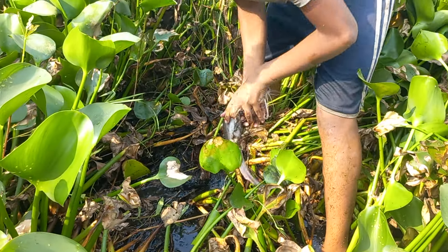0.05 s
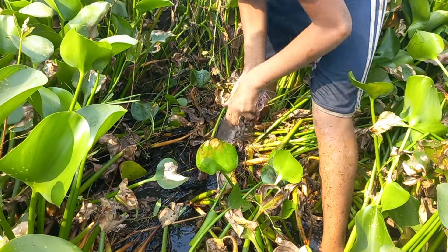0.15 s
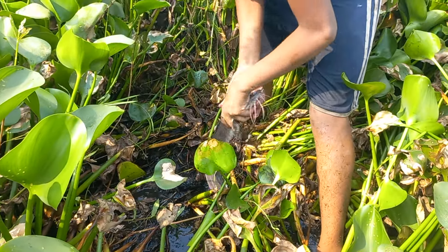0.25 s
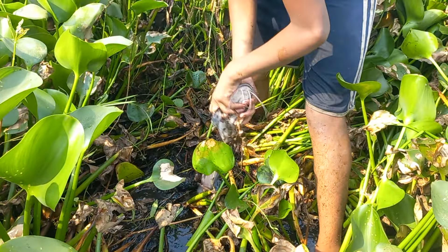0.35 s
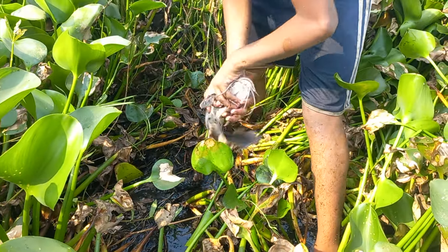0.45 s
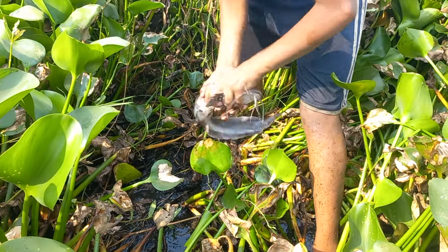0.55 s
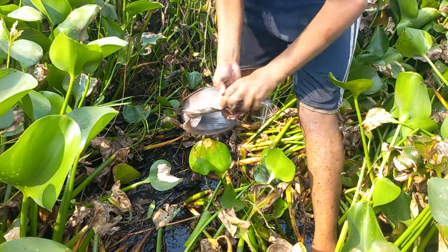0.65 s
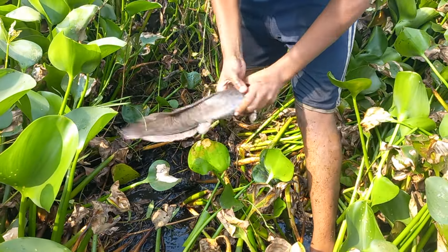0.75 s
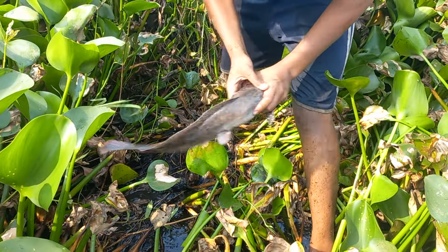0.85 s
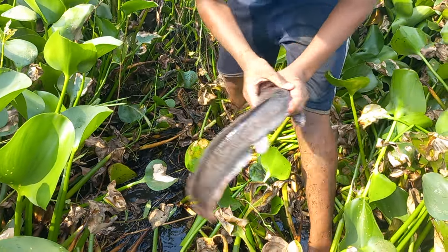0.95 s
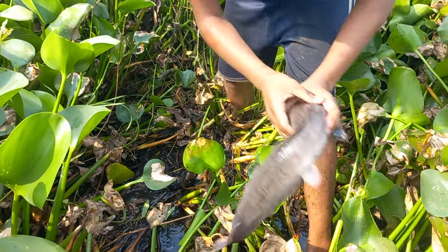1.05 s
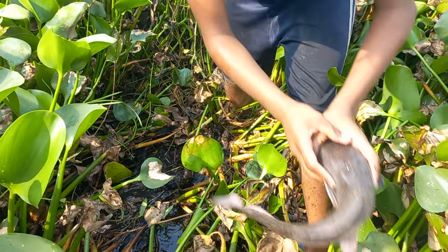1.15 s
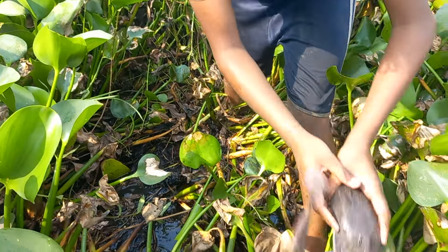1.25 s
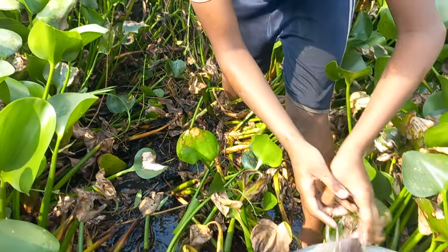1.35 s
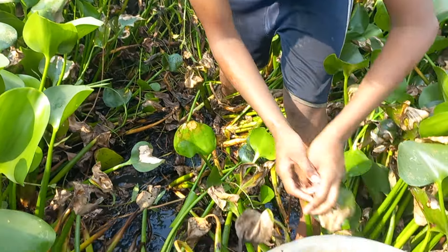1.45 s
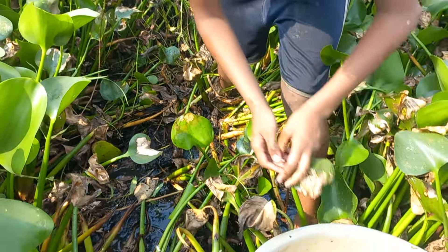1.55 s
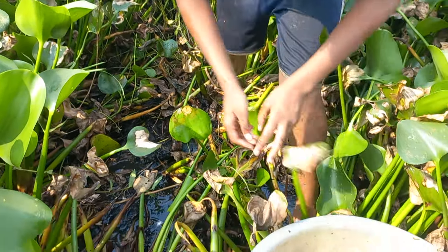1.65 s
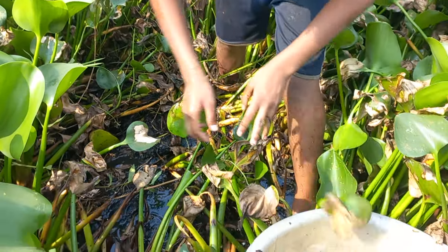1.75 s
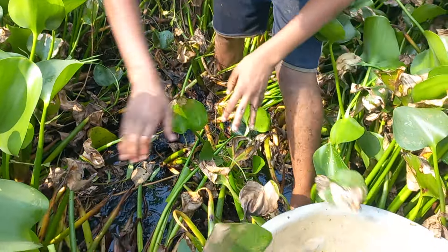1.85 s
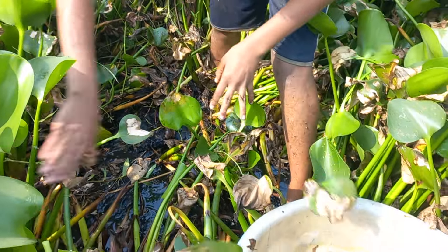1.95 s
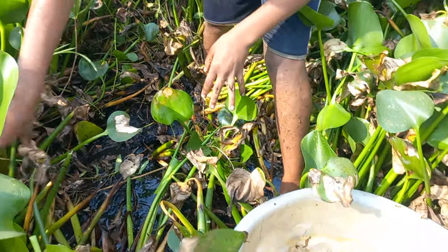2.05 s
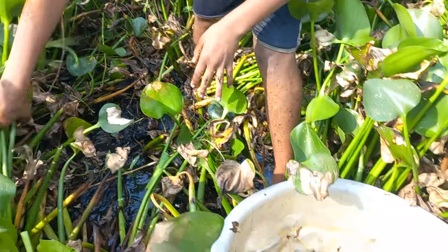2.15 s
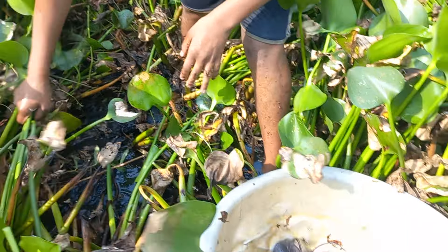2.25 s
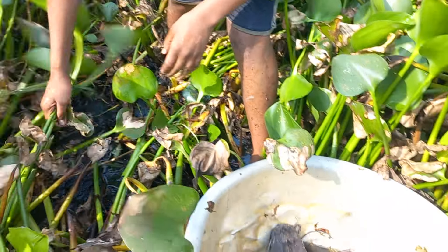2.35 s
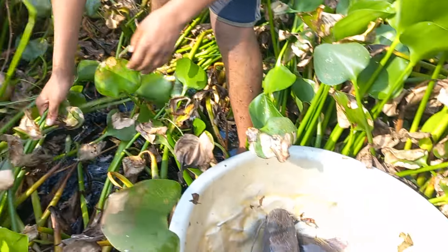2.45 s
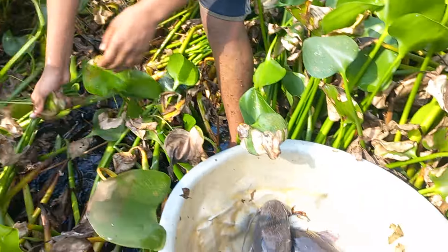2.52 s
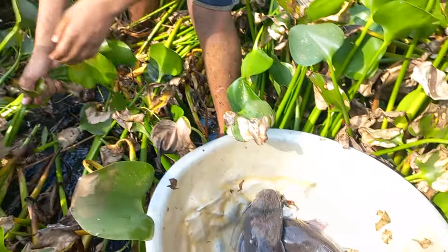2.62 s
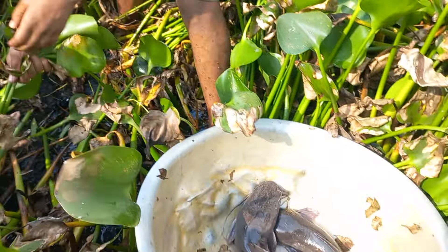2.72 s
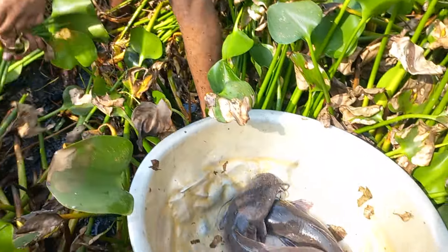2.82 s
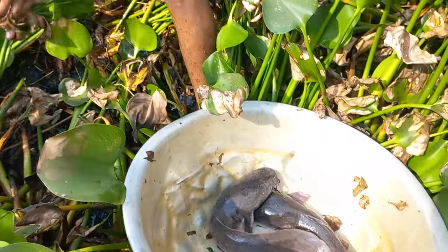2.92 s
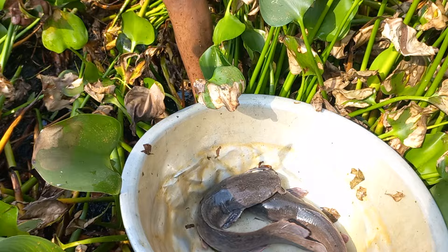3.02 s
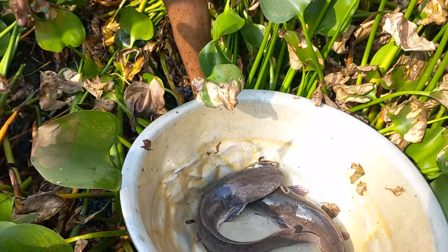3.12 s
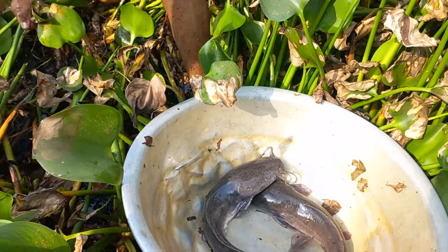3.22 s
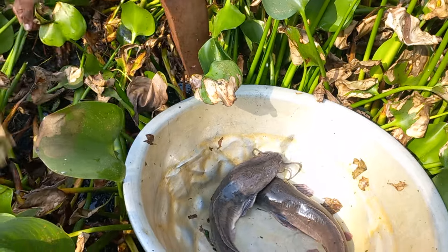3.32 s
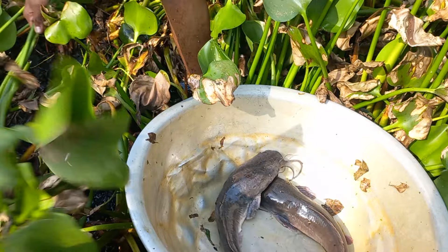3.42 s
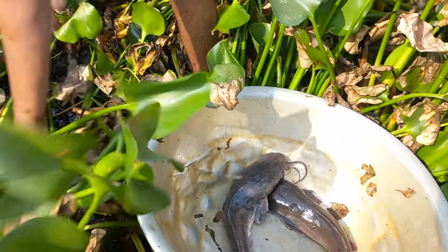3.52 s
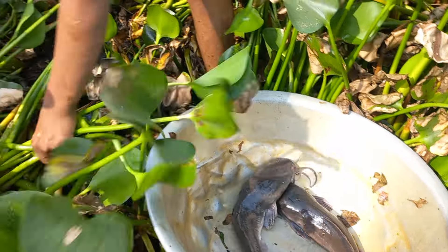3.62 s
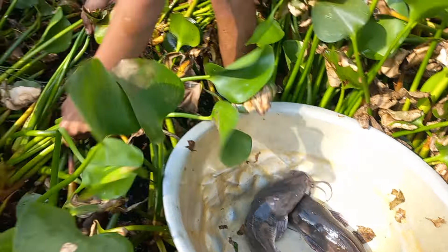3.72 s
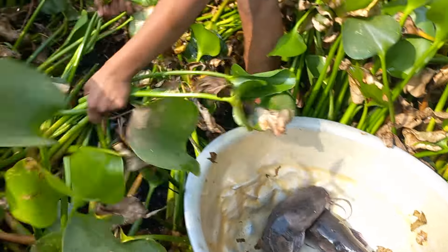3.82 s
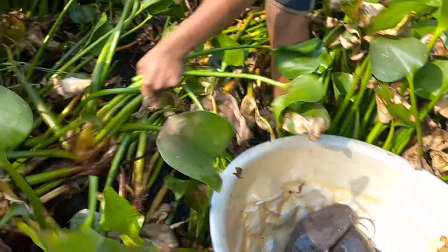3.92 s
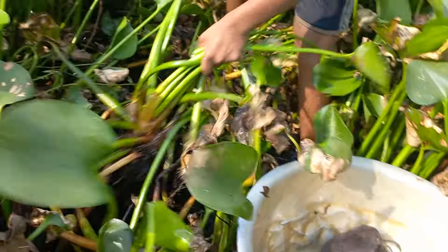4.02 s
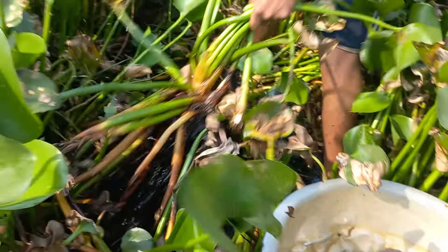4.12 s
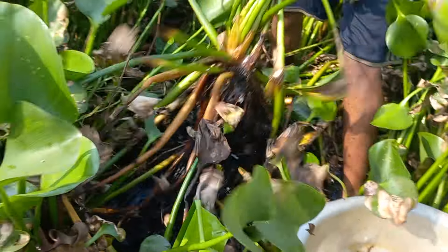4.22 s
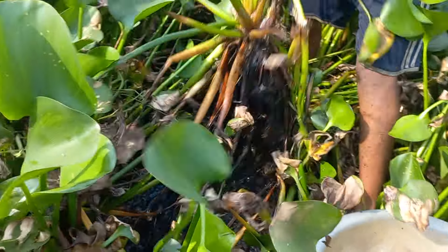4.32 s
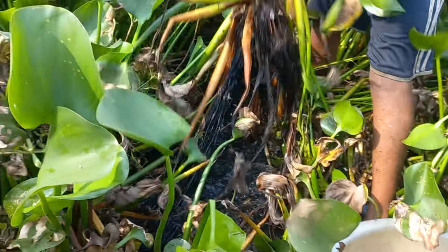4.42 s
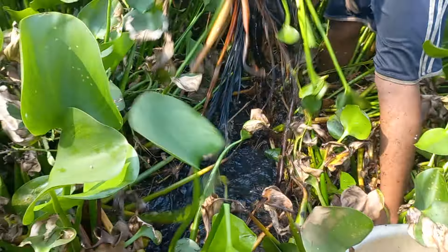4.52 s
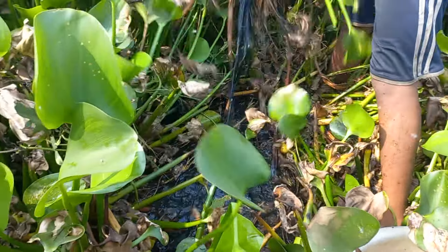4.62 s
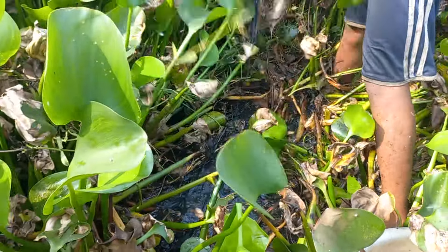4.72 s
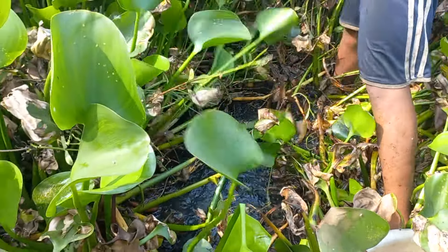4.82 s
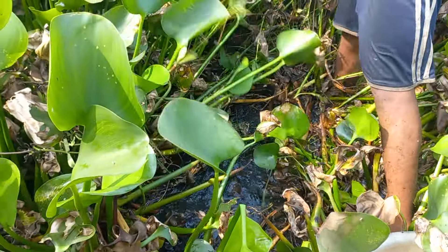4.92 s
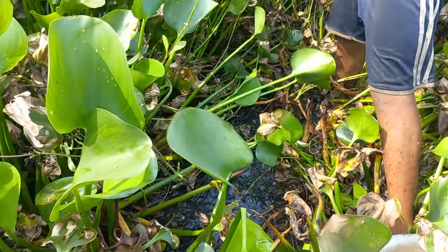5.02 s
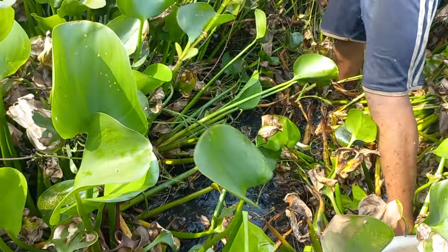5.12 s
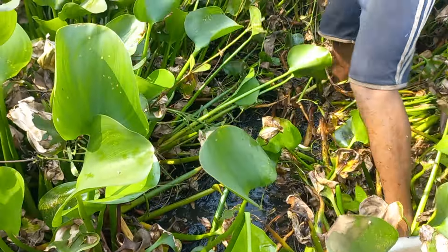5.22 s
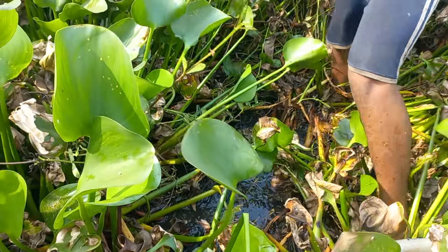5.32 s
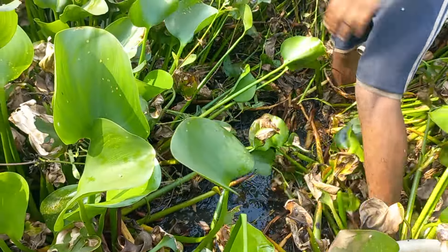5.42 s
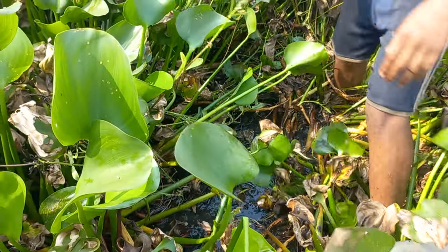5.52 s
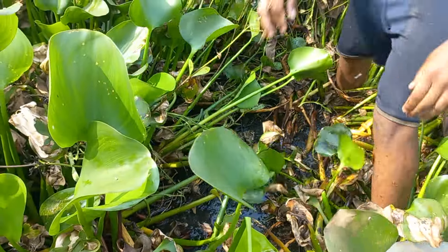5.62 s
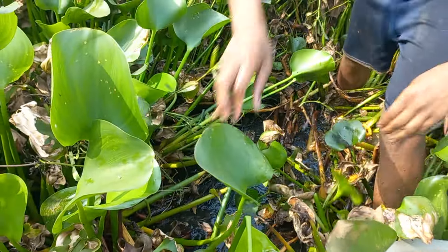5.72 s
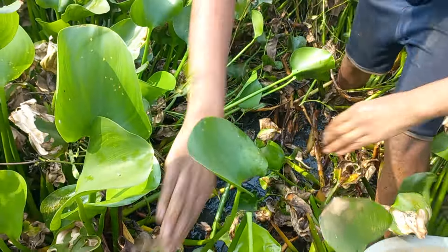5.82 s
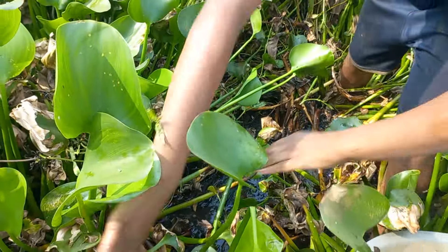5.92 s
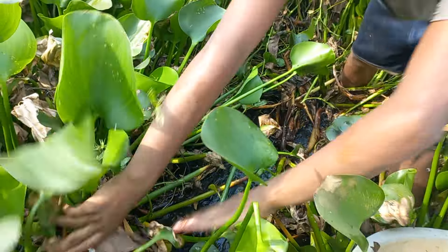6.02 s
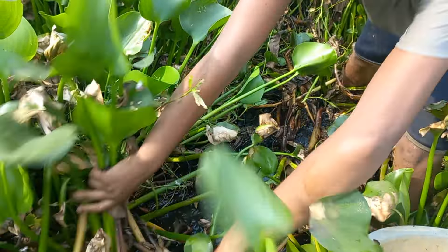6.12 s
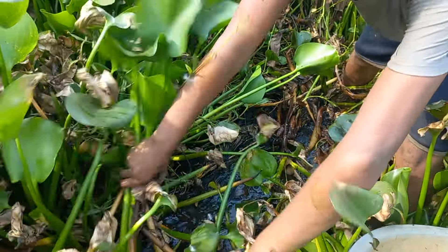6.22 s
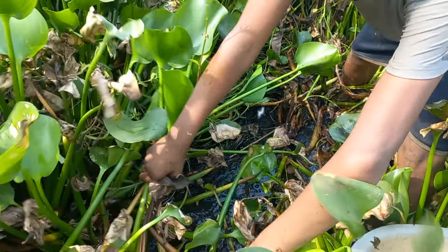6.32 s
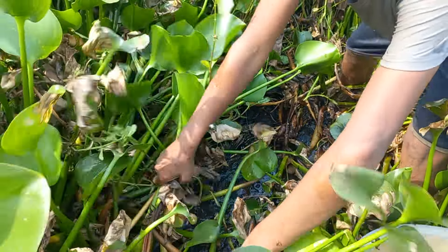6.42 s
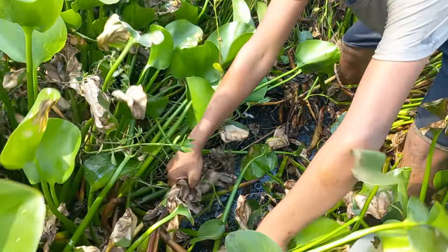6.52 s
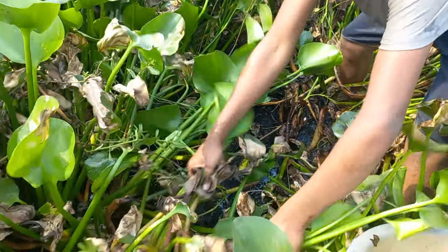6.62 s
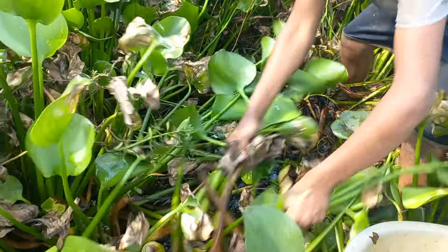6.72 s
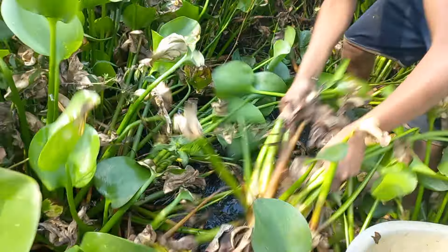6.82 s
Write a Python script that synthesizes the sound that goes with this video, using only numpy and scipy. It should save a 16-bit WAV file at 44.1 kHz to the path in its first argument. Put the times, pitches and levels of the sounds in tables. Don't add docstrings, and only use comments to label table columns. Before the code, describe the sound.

Outdoors, close to hands in wet vegetation. A fish slips quietly through wet hands while small birds whistle a falling run; it lands in a basin with a fluttering clatter and brief metallic ring. Sparse rustles and sharp stem cracks follow, building to wet ripping, snapping and hard slaps under low, lopsided wind bumps. Water pops and gurgles briefly, then leaves are torn crisply again. A distant engine pulses low throughout.

```python
import sys
import numpy as np
from scipy import signal
from scipy.fft import rfft, irfft, next_fast_len
from scipy.io import wavfile

SR = 44100
rng = np.random.default_rng(int(sys.argv[2]) if len(sys.argv) > 2 else 0)


def transcribe(u):
    v = np.clip(np.atleast_2d(u).T, -1, 1)
    q = np.round(v * 32767).astype(np.int16)
    wavfile.write(sys.argv[1], SR, q)


def amplitude_ratio(level_db):
    exponent = np.asarray(level_db, float) / 20
    return 10 ** exponent


N = 302614
T = np.arange(N) / SR

# time in seconds, effort as leaf rustle in dB, wetness as spray over leaf in dB.
HANDS = [(0, -47, -22.5), (1.26, -45.5, -18.5), (1.5, -34, -17), (1.81, -54, -22), (2.04, -47, -20),
         (2.31, -41, -9.5), (2.7, -47, -11), (2.82, -40, 0.5), (3.32, -40, -15.5), (3.5, -25.5, -0.5),
         (3.9, -32, -5), (4.07, -26.5, -2.5), (4.72, -35.5, -1.5), (5.33, -38.5, -9), (5.9, -40, -6),
         (6.19, -27, -2), (6.62, -35, -2.5), (6.86, -19.5, -8)]
MEAN_EFFORT_DB = -40
# level at mean effort in dB, dB per dB of effort, dB per dB of wetness.
STEM_LAW = (-38.5, 0.65, 0.32)
SLOSH_LAW = (-47, 0.94, -0.29)
# frequency in Hz, density in dB per Hz.
SLOSH_COLOUR = [(150, -5.5), (230, -1), (350, -1.5), (600, -2), (900, -7.5), (1400, -6.5)]
STEM_COLOUR = [(600, -14), (1000, 0), (1600, 4.5), (2400, 2), (2900, -8), (3600, -2)]
LEAF_COLOUR = [(2000, 4), (2700, -1.5), (3300, -2), (4200, 2), (5200, -2), (6200, -7.5), (7400, -75)]
SPRAY_COLOUR = [(4800, -0.5), (5800, 1.5), (7900, 3.5), (8700, -5.5), (9300, -13.5), (11500, -7),
                (15900, -4.5), (16200, -52)]
AIR_COLOUR = [(7500, -10), (9300, -6.5), (11500, -2.5), (15500, -1.5), (16100, -30)]
FISH_SKIN_COLOUR = [(700, -17), (2500, -5), (3100, -3.5), (4300, -1.5), (6200, -7.5), (7800, -29),
                    (15900, -34)]
AIR_DB = -54
# frequency in Hz, left-right likeness from -1 to 1.
LIKENESS = [(200, 0.92), (500, 0.88), (900, 0.4), (1500, -0.1), (3000, 0.082), (15000, -0.091)]
# frequency in Hz, left over right in dB.
LEAN = [(600, -0.5), (2000, 0.9), (4000, -8.5), (7000, 13.5), (10000, -1.5)]
# slosh in dB, stem in dB, leaf in dB, spray in dB, air in dB.
FLOP_MIX = (-28, -5, 3.5, -13.5, -9.5)
KNOCK_MIX = (-14, -2.5, -11, -70, -59)
CRACK_MIX = (-36, -15.5, -9, -29, -25)
SPLASH_MIX = (-10, -4, -5, -1.5, -27)
SLAP_MIX = (-20, -10.5, -5, -12, -17)
RUB_MIX = (-30, -2.5, -5, -11, -13)
# start in seconds, peak in dB, t60 in seconds.
FLOPS = [
    (1.3726, -19, 0.015),
    (1.4002, -21, 0.062),
    (1.4202, -5.5, 0.17),
    (1.465, -6, 0.059),
    (1.5131, -8, 0.052),
    (1.538, -18, 0.096),
    (1.5758, -9, 0.041),
]
# start
# in # seconds, peak in dB, t60 in seconds.
KNOCKS = [(1.341, -13.5, 0.031), (1.585, -10.5, 0.072), (1.7644, -25.5, 0.14), (2.167, -16, 0.16),
          (2.2067, -13, 0.024), (1.712, -26, 0.015), (3.7025, -8, 0.064), (5.454, -20, 0.17),
          (6.682, -4.5, 0.1)]
# start in seconds, peak in dB, t60 in seconds.
CRACKS = [(.3875, -11, 0.015), (2.3994, -4.5, 0.045), (2.424, -5, 0.02), (2.4917, -12, 0.046),
          (2.53, 1.5, 0.039), (2.843, -6, 0.015), (2.965, -7, 0.026), (4.8509, -3.5, 0.019),
          (4.324, -8, 0.015), (5.277, -11, 0.44), (6.3494, -3, 0.095), (4.394, -29, .02),
          (6.8004, -16, 0.071)]
# start in seconds, peak in dB, t60 in seconds.
SPLASHES = [(4.477, -30, 0.018), (2.7745, -17, 0.0047), (3.3897, -20.5, 0.18), (3.4525, -12, 0.02),
            (3.908, -12.5, 0.071), (4.6027, -29.5, 0.26), (4.7496, -15, 0.12), (5.2085, -28, 0.36),
            (5.4181, -14, 0.023), (6.374, -7.5, 0.03)]
# start in seconds, peak in dB, t60 in seconds.
SLAPS = [
    (2.8868, -17, 0.063),
    (3.861, -3.5, 0.12),
    (3.9315, -5.5, 0.12),
    (4.0225, 10, 0.024),
    (4.3042, -1.5, 0.029),
    (6.5271, -0.5, 0.067),
    (6.7275, 7, 0.017),
    (6.8524, 5, 0.012),
]
TICK_DB, TICK_T60_S = -8.5, 0.024
# middle in seconds, level in dB, half length in seconds.
HEAVES = [
    (3.57, -48, 0.2),
]
# middle in seconds, level in dB,
# # half length in seconds.
RUBS = [(1.437, -20.5, 0.015), (2.766, -33, 0.0052), (3.86, -28, 0.011), (3.986, -20.5, 0.013),
        (5.448, -23, 0.024), (6.19, -26.5, 0.037), (6.673, -31, 0.049), (6.761, -16.5, 0.029)]
# middle in seconds, level in dB, half length in seconds.
TAILS = [(.141, -32.5, 0.0097), (.161, -23.5, 0.0076), (.184, -22, 0.023), (.361, -31, 0.0067),
         (.407, -26, 0.027), (.64, -23.5, 0.015), (.845, -30, 0.011), (.878, -16, 0.021),
         (2.529, -23, 0.0074)]
# time in seconds, strength in dB, shelter of the right microphone in dB.
WIND = [(0.0, -38, 0.5), (1.36, -41.5, 1), (1.43, -28.5, -3.5), (1.62, -44, 3.5), (2.64, -49, -3.5),
        (3.4, -28, 8), (3.8, -38.5, -1), (3.93, -25, 7), (4.09, -27.5, 2), (4.22, -23.5, 15),
        (4.47, -24, 24), (4.68, -39.5, -0.5), (4.93, -38.5, 4), (5.83, -28.5, 11), (5.87, -35.5, 1.5),
        (6.13, -30.5, 3), (6.8, -36.5, 4.5), (6.86, -30, 15)]
# start in seconds, peak in dB, frequency in Hz, left over right in dB.
GUSTS = [(3.33, -12, 106, 2), (3.406, -9.5, 94, 6), (3.857, -18, 91, 36), (3.97, -0.5, 109, -10),
         (4.185, -11, 139, 29), (4.261, -8.5, 110, 32), (4.214, -11.5, 114, 30), (4.314, -11, 101, 31),
         (4.332, -13.5, 176, 24), (4.384, -12, 157, 24), (4.414, -14, 115, 34), (4.458, -15, 102, 32),
         (4.579, -13, 106, 24), (5.539, -18.5, 107, 29), (5.589, -17.5, 112, 30), (5.654, -18, 82, 26),
         (6.149, -12.5, 88, 19), (6.674, -19.5, 94, 36)]
# time in seconds, firings per second, level in dB.
PUMP = [(0, 13.18, -41), (1.4, 13.18, -41), (1.9, 13.18, -46), (2.8, 13.18, -45), (3.2, 13.09, -43),
        (6.86, 13.09, -43)]
FIRST_FIRING_S = .070
# start in seconds, length in seconds, level in dB.
RUN = [(0.429, 0.022, -35), (0.524, 0.017, -29.5), (0.603, 0.018, -30), (0.681, 0.021, -32),
       (0.76, 0.028, -33.5), (0.849, 0.02, -28), (0.928, 0.029, -37), (1.013, 0.045, -36),
       (1.092, 0.039, -38), (1.138, 0.033, -44), (1.182, 0.025, -33)]
RUN_START_HZ, RUN_SAG_HZ_PER_S, NOTE_SAG_HZ_PER_S = 3057, 280, 7000
# start in seconds, length in seconds, start pitch in Hz,
# end pitch in Hz, level in dB.
WARBLE = [(0.045, 0.04, 3150, 2950, -37), (.268, 0.034, 3250, 3120, -34), (0.5, 0.04, 3250, 3800, -35),
          (.532, .034, 3700, 5200, -40), (.575, .018, 4400, 3900, -39), (.6, .018, 4250, 3750, -41),
          (0.642, 0.022, 3790, 3500, -32), (0.66, .025, 3750, 3450, -35), (.682, .022, 4150, 3500, -36),
          (0.715, 0.022, 3900, 3450, -35), (.735, .03, 3750, 3200, -36), (0.795, 0.04, 4600, 4050, -37),
          (.943, .018, 4050, 3700, -37), (0.955, 0.03, 3680, 3560, -37), (1.007, .018, 4050, 3450, -35),
          (1.025, .018, 3700, 3300, -36), (1.11, .02, 3650, 3500, -41), (.905, .035, 3500, 4600, -42),
          (1.172, .024, 3750, 3530, -32), (1.196, 0.022, 3800, 3500, -31), (1.267, 0.05, 3500, 4130, -38),
          (1.993, 0.022, 2030, 2030, -43), (3.19, 0.035, 2030, 2030, -37), (3.758, .035, 4350, 3950, -26),
          (4.352, 0.035, 4450, 3850, -31), (4.624, 0.036, 4450, 3850, -26)]
# start in seconds, level in dB.
CHIRPS = [(1.895, -36), (2.188, -37), (2.804, -32), (3.099, -22.5), (3.419, -22.5), (3.735, -24),
          (4.68, -31), (4.991, -26)]
# time in seconds, pitch in Hz, level in dB.
CHIRP_SHAPE = [(0, 5450, -4), (.014, 5000, 0), (.021, 4000, -1), (.031, 3000, -3), (.05, 2550, -6),
               (.07, 2700, -16)]
# middle in
# seconds, level in dB, half length in seconds, resonance in Hz.
SCRAPES = [(0.174, -27.5, 0.014, 4470), (0.18, -39, 0.015, 2550), (0.399, -30, 0.018, 3270),
           (0.635, -22, 0.012, 3840), (0.875, -14.5, 0.0088, 4500), (1.48, -19, 0.011, 1350),
           (1.601, -23, 0.048, 1740), (2.11, -39.5, 0.034, 2310), (2.179, -29, 0.024, 2300),
           (2.3, -36.5, 0.085, 2360), (2.528, -16, 0.01, 2580), (2.578, -40.5, 0.051, 2600),
           (2.841, -25.5, 0.0069, 2450), (2.919, -37.5, 0.081, 2320), (3.183, -27, 0.008, 2330),
           (3.42, -29.5, 0.043, 2170), (3.572, -25, 0.05, 4600), (3.573, -25.5, 0.028, 352),
           (3.687, -30, 0.038, 257), (3.86, -13, 0.013, 6840), (3.986, -21, 0.012, 2200),
           (4.196, -35, 0.093, 1470), (4.429, -33, 0.056, 4140), (4.606, -24.5, 0.0071, 5900),
           (4.751, -26.5, 0.0058, 8900), (4.873, -30, 0.0034, 1480), (4.891, -30.5, 0.004, 1610),
           (4.943, -23, 0.0042, 4600), (5.29, -30, 0.012, 1160), (5.451, -24.5, 0.0088, 6700),
           (5.829, -34.5, 0.051, 1600), (5.849, -31.5, 0.0072, 5930), (6.173, -31, 0.024, 2300),
           (6.312, -26, 0.019, 7060), (6.528, -17.5, 0.0082, 4530), (6.684, -13.5, 0.014, 2060),
           (6.766, -16.5, 0.016, 1860), (6.775, -11.5, 0.011, 5840), (2.772, -26, 0.0023, 7850),
           (2.172, -29, 0.0034, 2200), (2.205, -27, 0.0074, 2280), (6.284, -25, 0.0098, 440),
           (3.67, -25, .012, 1710), (1.576, -22, 0.0066, 1500), (1.434, -18.5, 0.011, 1980)]
SCRAPE_OCTAVES, SLIP_DB = 0.14, 5
# start in seconds, start pitch in Hz, rise per second, level in dB, t60 in seconds.
BUBBLES = [(0.479, 1000, 35, -34, 0.12), (2.629, 1330, 11, -28.5, 0.031), (2.797, 510, 36, -23, 0.016),
           (2.889, 830, 25, -28.5, 0.032), (3.105, 562, 30, -31.5, 0.22), (1.2, 920, 6.5, -40, 0.062),
           (2.532, 240, 10, -28, 0.033), (3.388, 264, 30, -22, .03), (3.407, 238, 29, -13.5, 0.021),
           (3.448, 1200, 1.8, -33, .05), (3.638, 1390, 12, -21, .03), (5.1, 520, 25, -23, 0.011),
           (5.209, 1270, 12, -19, .018), (5.373, 353, 50, -15.5, 0.014), (5.392, 358, 24, -16.5, 0.013),
           (5.416, 1340, 12, -15.5, 0.025), (5.57, 590, 23, -33, 0.018), (5.705, 1800, 12, -28, 0.034),
           (5.399, 1290, 14, -16.5, 0.028), (5.454, 1845, 48, -3, 0.017), (5.595, 450, 51, -25.5, 0.025),
           (5.617, 1950, 13, -26, 0.033), (5.638, 1300, 14, -23.5, 0.015), (5.662, 895, 29, -32, 0.11),
           (5.876, 854, 22, -33.5, 0.22), (6.214, 1150, 11, -13.5, 0.027), (6.264, 2090, 12, -15.5, 0.028)]
# start in seconds, ring in dB, thud in dB, loss of the high modes in dB.
BLOWS = [(1.422, -21, -21, 12), (1.453, -38, -17.5, -5), (1.470, -22, -26, 0), (1.514, -18, -20, 9.5),
         (1.578, -27, -45, 1.5), (1.541, -24.5, -41, 12.5), (1.597, -26.5, -50, 1), (1.613, -30, -49, 24),
         (1.638, -24, -33, 22), (1.764, -28, -45, 22), (3.656, -14, -28, 28.5), (3.715, -25.5, -30, 29),
         (6.273, -16, -27, 27)]
# frequency in Hz, level in dB, t60 in seconds.
BASIN_MODES = [(352, -11.5, 0.57), (672, -11, 0.18), (911, -12.5, 0.37), (1060, -19.5, 0.55),
               (1320, -1, 0.18), (1360, 12.5, 0.18), (1376, 5, 0.26), (1554, -0.5, 0.28), (1615, 1.5, 0.16),
               (1675, 3, 0.35), (1834, 13.5, 0.16), (1925, 7, 0.1), (2090, 9, 0.1), (2600, 6.5, 0.053)]
TWIN_RATIO, TWIN_T60_SHARE = 1.022, 0.64
# start in seconds, peak in dB, resonance in Hz, left over right in dB,
# t60 in seconds.
SNAPS = [(2.588, -17.5, 4630, 9, 0.023), (2.7154, -21.5, 2660, 10, 0.019), (2.7748, -2, 4200, 19, 0.0041),
         (2.3998, -14, 3470, -1, 0.018), (3.3035, -18.5, 2440, -10, 0.018), (3.349, -20, 2370, 1, 0.015),
         (3.3907, -10, 2050, 6, 0.021), (3.4545, -26, 7040, 8, 0.0093), (3.5433, -11, 4630, 0.0, 0.018),
         (3.563, -5.5, 4670, 11, 0.018), (3.6114, -11, 2100, 14, 0.015), (3.701, -1, 3010, -9, 0.026),
         (3.707, -4, 1920, -1, 0.02), (3.7555, -7.5, 4170, -16, 0.019), (3.841, -17, 6260, 14, 0.015),
         (3.859, -8, 7000, 6, 0.018), (3.9833, -21, 4610, 32, 0.015), (4.119, -8, 4280, 0.5, 0.015),
         (4.306, -7.5, 4130, -17, 0.035), (4.455, -11.5, 1620, 4, 0.01), (4.5036, -19.5, 7330, 9, 0.012),
         (4.4554, -12.5, 6860, 7, 0.016), (5.303, -26, 3290, -3, 0.015), (5.938, -16.5, 1440, 1.0, 0.016),
         (6.0935, -7.5, 2870, 6, 0.018), (6.1564, -12, 2240, -1, 0.016), (6.1839, -6, 1940, -1, 0.017),
         (6.2956, -13, 1640, 2, 0.015), (6.3165, -14.5, 7350, 11, 0.015), (6.4145, -12, 2150, 0.5, 0.015),
         (6.644, -21, 1710, 0.0, 0.015), (6.7297, 1, 4380, -5, 0.013), (6.758, 2, 1700, -4, 0.015),
         (6.7712, -5, 6030, 13, 0.022), (6.8024, -8, 4500, 12, 0.011), (6.8544, -7, 4160, 8, 0.013)]
SNAP_OCTAVES = 0.51
SNAP_LEAD_SAMPLES = 5
SNAP_NEEDLE = 5.9


def rms_one(x):
    return x / np.sqrt(np.mean(x ** 2) + 1e-20)


def in_time(rows):
    s, *columns = np.transpose(rows)
    return [np.interp(T, s, column) for column in columns]


def at_hz(points, hz):
    point_hz, value = np.transpose(points)
    return np.interp(np.log(hz + 1), np.log(point_hz), value)


def sides(pan_db):
    return amplitude_ratio(np.array([pan_db / 2, -pan_db / 2]))


def band(x, low_hz, high_hz, order=2):
    return signal.sosfilt(signal.butter(order, [low_hz, high_hz], "band", fs=SR, output="sos"), x)


def drift(rate):
    r = np.exp(-80 * np.pi * rate / SR)
    noise = rng.standard_normal(N // 40 + 2002)
    slow = signal.lfilter([1], [1, -2 * r, r * r], noise)[2000:]
    return np.interp(np.arange(N) / 40, np.arange(len(slow)), rms_one(slow))


def ring(clicks, hz, t60):
    r, w = amplitude_ratio(-60 / (t60 * SR)), 2 * np.pi * hz / SR
    return signal.lfilter([0, np.sin(w)], [1, -2 * r * np.cos(w), r * r], clicks + 1e-18)


def sweep(hz):
    return np.sin(2 * np.pi * np.cumsum(hz) / SR)


def add(out, s, piece):
    i = max(round(s * SR), 0)
    out[..., i:i + piece.shape[-1]] += piece[..., :N - i]


def friction(envelope, spectrum):
    size = next_fast_len(N)
    hz = np.arange(size // 2 + 1) * SR / size
    inside = (hz > spectrum[0][0]) * (hz < spectrum[-1][0])
    colour = rms_one(inside * amplitude_ratio(at_hz(spectrum, hz)))
    alike = np.clip(at_hz(LIKENESS, hz), -1, 1)
    mid, side = rng.standard_normal((2, N))
    both = np.sqrt(1 + alike) * rfft(mid * envelope, size)
    both = both + np.sqrt(1 - alike) * rfft(side * envelope, size) * [[1], [-1]]
    return irfft(colour * both, size)[:, :N] / np.sqrt(2)


def crackle(per_s, spread_db, t60, share, patchy_db):
    born = rng.random(N) < per_s * amplitude_ratio(5.0 * drift(5)) / SR
    ticks = born * amplitude_ratio(spread_db * np.minimum(rng.exponential(1, N), 4))
    ticks = signal.lfilter([1], [1, -amplitude_ratio(-60 / (t60 * SR))], ticks + 1e-18)
    return rms_one(amplitude_ratio(patchy_db * drift(14)) + share * rms_one(ticks))


def swells(rows, jerks):
    out = np.zeros(N)
    for s, db, half_s in rows:
        add(out, s - 1.515 * half_s, amplitude_ratio(db) * np.hanning(round(2.76 * half_s * SR)))
    return out * jerks


def rustle(leaf_db, stem_db, slosh_db, wet_db):
    fibres = crackle(per_s=300, spread_db=3.5, t60=.006, share=.5, patchy_db=1.6)
    slosh = amplitude_ratio(slosh_db) * crackle(per_s=60, spread_db=4, t60=.04, share=.6, patchy_db=2.1)
    slosh = slosh + swells(HEAVES, fibres)
    stem = amplitude_ratio(stem_db) * crackle(per_s=150, spread_db=3.8, t60=0.012, share=0.45, patchy_db=1.5)
    leaf = amplitude_ratio(leaf_db + 1.6 * drift(11)) * fibres
    spray = amplitude_ratio(leaf_db + wet_db) * fibres
    air = amplitude_ratio(AIR_DB + 0.53 * (leaf_db - MEAN_EFFORT_DB))
    return np.array([slosh, stem, leaf, spray, air])[:, None] * np.ones((2, 1))


def contacts():
    drive, t = np.zeros((5, 2, N)), T[:SR // 4]
    onset = 1 - np.exp(-t / 0.00068)
    tables = (FLOPS, FLOP_MIX), (KNOCKS, KNOCK_MIX), (CRACKS, CRACK_MIX), (SPLASHES, SPLASH_MIX), (SLAPS, SLAP_MIX)
    for rows, mix_db in tables:
        mix = amplitude_ratio(np.array(mix_db))[:, None, None]
        for (s, db, t60), pan_db in zip(rows, rng.normal(0, 1, len(rows))):
            body = amplitude_ratio(db - 10.0 - 60 * t / np.clip(t60, .006, .3))
            tick = amplitude_ratio(db - 14.5 + TICK_DB - 60 * t / TICK_T60_S)
            add(drive, s, mix * ((body + tick) * onset * sides(pan_db)[:, None]))
    return drive


def patchy(x, patchy_db, own_db):
    size = next_fast_len(N)
    hz = np.arange(1, size // 2 + 2) * SR / size
    place = np.clip(2 * np.log2(hz / 600), 0, 8)
    spectrum, out = rfft(x, size), 0
    for k in range(9):
        apart_db = own_db * drift(4.4) + at_hz(LEAN, 600 * 2 ** (k / 2)) / 2
        gain_db = patchy_db * drift(12.7) + apart_db * np.array([[1], [-1]])
        weight = np.clip(1 - abs(place - k), 0, 1)
        out = out + amplitude_ratio(gain_db) * irfft(spectrum * weight, size)[:, :N]
    return out


def droplets(level_db, per_s):
    born = rng.random(N) < per_s * amplitude_ratio(4 * drift(6)) / SR
    sizes = amplitude_ratio(5 * np.minimum(rng.exponential(1, N), 3)) * born
    dealt, left = rng.integers(0, 18, N), rng.random(N)
    placed = sizes * np.sqrt([left, 1 - left]) * rng.choice([-1, 1], (2, N))
    pitches_hz = np.geomspace(1500, 7500, 18)
    pops = sum(ring(placed * (dealt == k), hz, 77.0 / hz) for k, hz in enumerate(pitches_hz))
    return amplitude_ratio(level_db) * rms_one(pops)


def plants():
    leaf_db, wet_db = in_time(HANDS)
    effort_db = leaf_db - MEAN_EFFORT_DB
    stem_db, slosh_db = [db + a * effort_db + b * wet_db for db, a, b in (STEM_LAW, SLOSH_LAW)]
    jerks = crackle(per_s=400, spread_db=4, t60=.008, share=.8, patchy_db=1.5)
    drive = rustle(leaf_db, stem_db, slosh_db, wet_db) + contacts()
    drive = drive + amplitude_ratio(np.array(RUB_MIX))[:, None, None] * swells(RUBS, jerks)
    colours = SLOSH_COLOUR, STEM_COLOUR, LEAF_COLOUR, SPRAY_COLOUR, AIR_COLOUR
    rubbed = sum(friction(envelope, colour) for envelope, colour in zip(drive, colours))
    tail = friction(swells(TAILS, jerks), FISH_SKIN_COLOUR)
    drops = droplets((stem_db + leaf_db) / 2 - 1 + .3 * wet_db, per_s=400)
    return patchy(rubbed, patchy_db=2.2, own_db=1.0) + tail + drops


def wind():
    own = rng.standard_normal((2, N)) + 1.96 * rng.standard_normal(N)
    lumpy = own * amplitude_ratio(np.array([3 * drift(18), 3 * drift(18)]))
    strength_db, shelter_db = in_time(WIND)
    level_db = np.array([strength_db, strength_db - shelter_db])
    out = rms_one(band(band(lumpy, 66.5, 108.2), 36.4, 163, order=3)) * amplitude_ratio(level_db + 2.5)
    out += rms_one(band(lumpy, 148, 280)) * amplitude_ratio(1.85 * level_db + 14.0)
    t = T[:SR // 20]
    for s, db, hz, pan_db in GUSTS:
        swell = np.sin(np.pi * np.minimum(t * hz / 2.72, 1)) ** 2
        buffet = amplitude_ratio(db - 10.0) * swell * np.sin(2 * np.pi * hz * t)
        add(out, s, buffet * sides(pan_db)[:, None])
    return out


def pump():
    per_s, db = in_time(PUMP)
    turns = np.cumsum(per_s) / SR - FIRST_FIRING_S * per_s[0]
    fired = np.diff(np.floor(turns), prepend=-1) > 0
    pulses = fired * amplitude_ratio(2.5 * drift(8))
    far = signal.cheby1(6, 1, 165, fs=SR, output="sos")
    return amplitude_ratio(db) * rms_one(signal.sosfilt(far, band(pulses, 82.4, 155.0)))


def birds():
    out, run = np.zeros(N), []
    for s, length, db in RUN:
        hz = RUN_START_HZ - RUN_SAG_HZ_PER_S * (s - RUN[0][0])
        run.append((s, length, hz, hz - NOTE_SAG_HZ_PER_S * min(length, .03), db))
    for s, length, start_hz, end_hz, db in run + list(WARBLE):
        u = np.arange(round(length * SR)) / (length * SR)
        bend = 0.58 if end_hz < start_hz else 1.3
        note = sweep(start_hz + (end_hz - start_hz) * u ** bend)
        add(out, s, amplitude_ratio(db) * np.sqrt(np.sin(np.pi * u)) * note)
    when, pitch_hz, level_db = np.transpose(CHIRP_SHAPE)
    t = T[:round(when[-1] * SR)]
    envelope = amplitude_ratio(np.interp(t, when, level_db)) * np.minimum(t / 0.00051, 1)
    chirp = envelope * sweep(np.interp(t, when, pitch_hz))
    for s, db in CHIRPS:
        add(out, s, amplitude_ratio(db) * chirp)
    out = out * amplitude_ratio(2 * drift(170))
    scatter = rng.standard_normal((2, SR // 3)) * amplitude_ratio(-37 - 60 * T[:SR // 3] / .4)
    return np.array([out, np.roll(out, 20)]) + signal.fftconvolve(out[None], scatter)[:, :N]


def scrapes():
    out, slips = np.zeros((2, N)), amplitude_ratio(SLIP_DB * drift(120))
    width = 2 ** SCRAPE_OCTAVES
    noises = rng.standard_normal((len(SCRAPES), 3, SR // 4))
    for (s, db, half_s, hz), (both, left, right) in zip(SCRAPES, noises):
        stroke = np.hanning(round(2.4 * min(half_s, .08) * SR))
        noise = rms_one(band(both + 1.16 * np.array([left, right]), hz / width, hz * width))
        add(out, s - len(stroke) / SR / 2, amplitude_ratio(db) * stroke * noise[:, :len(stroke)])
    return out * rms_one(slips)


def bubbles():
    out, t = np.zeros(N), T[:SR // 8]
    for s, hz, rise, db, t60 in BUBBLES:
        envelope = amplitude_ratio(db - 60 * t / t60) * np.minimum(t / 0.00058, 1)
        add(out, s, envelope * np.sin(2 * np.pi * hz * (t + rise * t * t / 2)))
    return out


def basin():
    start_s, ring_db, thud_db, soft_db = np.transpose(BLOWS)
    at = [round(s * SR) for s in start_s]
    rings, thuds = np.zeros(N), np.zeros(N)
    for hz, level_db, t60 in BASIN_MODES:
        clicks = np.zeros(N)
        strength_db = ring_db + level_db - soft_db * (hz > 1200) + 1.5 * rng.standard_normal(len(at))
        clicks[at] = amplitude_ratio(strength_db) * rng.choice([-1, 1], len(at))
        twin = (hz > 500) * ring(clicks, hz * TWIN_RATIO, t60 * TWIN_T60_SHARE)
        damping_db = (4 * drift(60) - 3) * min(hz / 1200, 1) ** 2
        rings += (ring(clicks, hz, t60) + twin) * amplitude_ratio(damping_db)
    thuds[at] = amplitude_ratio(thud_db)
    thud = ring(thuds, 208, 0.067) + amplitude_ratio(10.5) * ring(thuds, 273, 0.032) + amplitude_ratio(0.5) * ring(thuds, 624, 0.03)
    return np.array([rings, np.roll(rings, 5)]) + thud


def snaps():
    out, t = np.zeros((2, N)), T[:SR // 10]
    width = 2 ** SNAP_OCTAVES
    noises = rng.standard_normal((len(SNAPS), len(t)))
    for (s, db, hz, pan_db, t60), noise in zip(SNAPS, noises):
        burst = rms_one(band(noise + SNAP_NEEDLE * (t == 0), hz / width, hz * width))
        burst = burst * amplitude_ratio(db - 9.5 - 60 * t / np.clip(t60, .003, .08))
        pair = np.array([burst, np.roll(burst, SNAP_LEAD_SAMPLES)])
        add(out, s, pair * sides(pan_db)[:, None])
    return out


def scene():
    return plants() + wind() + pump() + birds() + scrapes() + bubbles() + basin() + snaps()


def roll_off(x):
    return signal.sosfilt(signal.butter(12, 17020, fs=SR, output="sos"), x)


def record(dry):
    no_rumble = signal.sosfilt(signal.butter(3, 55, "high", fs=SR, output="sos"), dry)
    mix = 1.013 * np.tanh(no_rumble / 1.318)
    return roll_off(mix)


dry = scene()
out = record(dry)
transcribe(out)
```